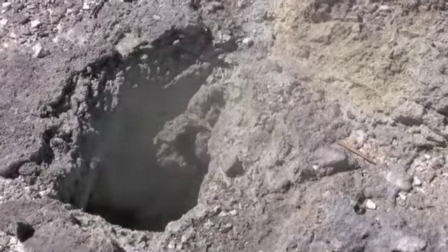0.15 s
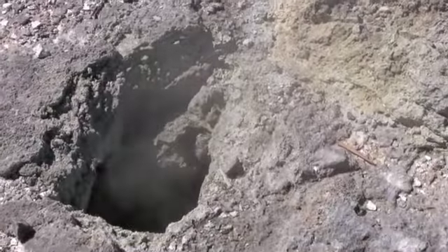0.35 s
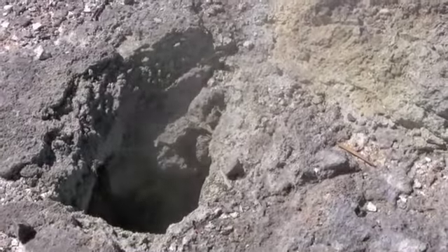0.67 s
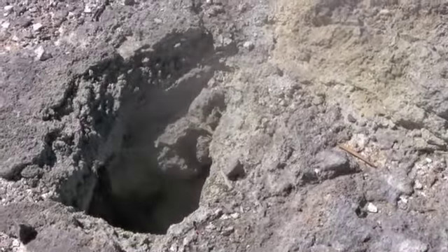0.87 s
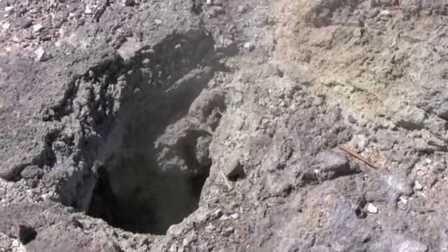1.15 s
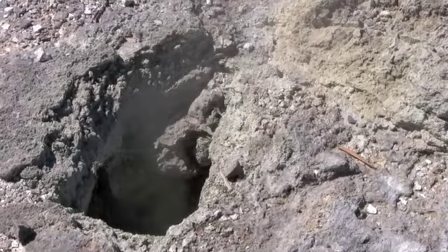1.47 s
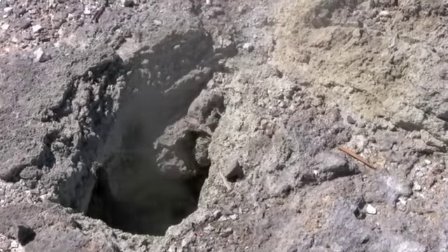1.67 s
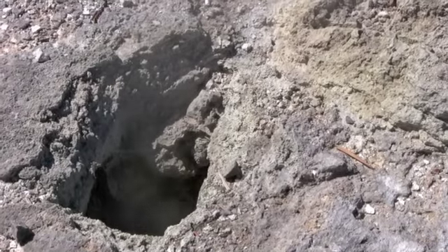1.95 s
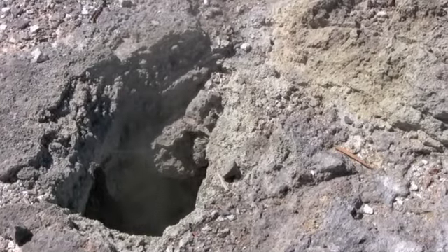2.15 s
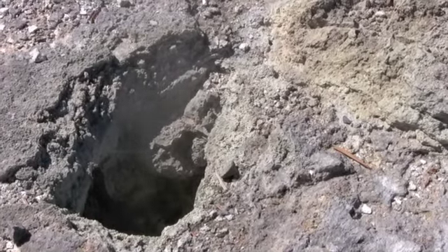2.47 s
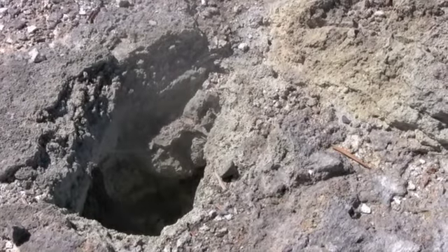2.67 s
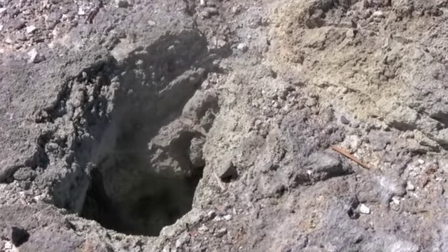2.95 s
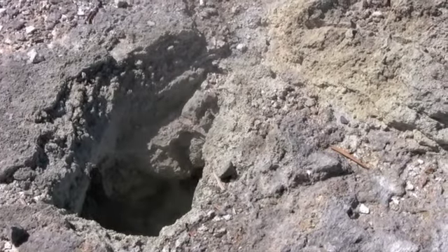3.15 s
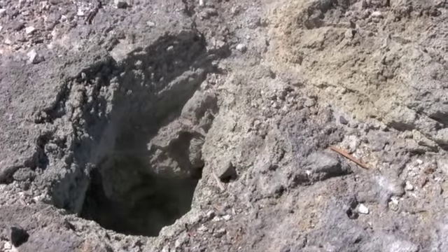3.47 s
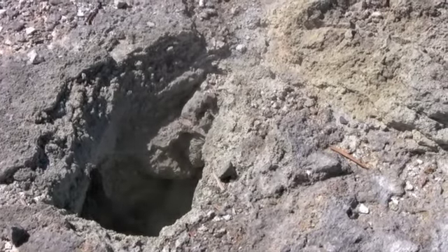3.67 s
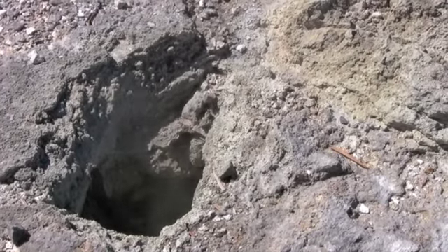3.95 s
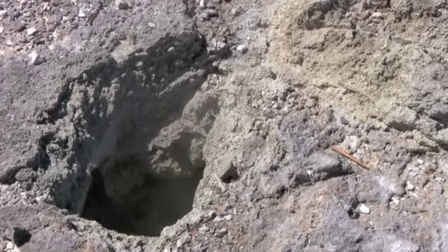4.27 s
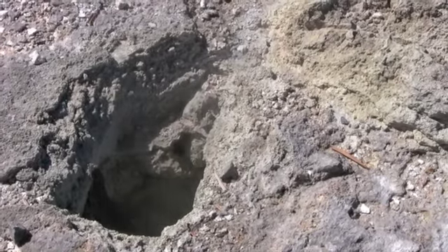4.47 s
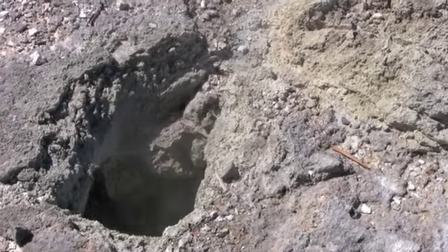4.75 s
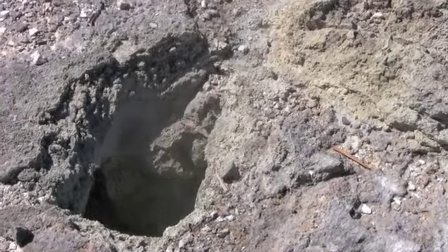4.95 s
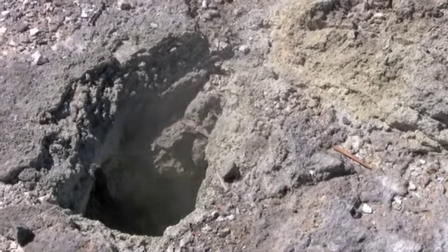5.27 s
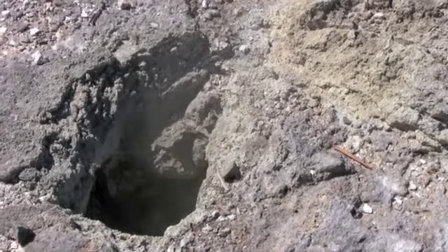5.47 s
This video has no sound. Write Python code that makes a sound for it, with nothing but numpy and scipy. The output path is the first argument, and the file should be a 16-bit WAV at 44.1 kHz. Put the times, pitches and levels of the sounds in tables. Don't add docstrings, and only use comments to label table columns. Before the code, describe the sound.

Hot mud bubbles in a stony hole, irregular low plops and wet ticks bursting in clusters over a quiet steady simmer and faint camera hiss.

```python
import sys
import numpy as np
from scipy import signal
from scipy.io import wavfile
from scipy.ndimage import uniform_filter1d

SR = 44100
rng = np.random.default_rng(int(sys.argv[2]) if len(sys.argv) > 2 else 0)


def dump(signal):
    limited = np.clip(np.atleast_2d(signal).T, -1, 1)
    pcm = np.round(limited * 32767).astype(np.int16)
    wavfile.write(sys.argv[1], SR, pcm)


def level_to_linear(level):
    exponent = np.asarray(level, float) / 20
    return 10 ** exponent


N = 247401


def evened(x):
    return x / np.sqrt(np.mean(x ** 2) + 1e-20)


def read(points, hz):
    f, value = np.transpose(points)
    return np.interp(np.log(hz + 1), np.log(f + 1), value)


def add(mix, s, sound):
    part = mix[..., round(s * SR):][..., :sound.shape[-1]]
    part += sound[..., :part.shape[-1]]


# (pitch [Hz], likeness [0-1])
LIKENESS = [(60, 0.74), (150, 0.62), (380, 0.9), (950, 0.68), (2380, 0.53), (5980, 0.07), (15000, 0.00039)]


def noise(spectrum, patchy_db, flicker_db):
    frames, hz = N // 128 + 9, np.fft.rfftfreq(1024, 1 / SR)
    a, b, c, d, patches = rng.standard_normal((frames, 513, 5)).T
    patches = uniform_filter1d(patches, size=9, axis=0)
    patches = evened(uniform_filter1d(patches, size=12, axis=1))
    flicker = evened(uniform_filter1d(rng.standard_normal(frames), size=5))
    same = np.clip(read(LIKENESS, hz), -.99, .99)[:, None]
    mid = np.sqrt(1 + same) * (a + 1j * b)
    side = np.sqrt(1 - same) * (c + 1j * d)
    level_db = read(spectrum, hz)[:, None] + patchy_db * patches + flicker_db * flicker
    z = np.array([mid + side, mid - side]) * level_to_linear(level_db)
    return evened(signal.istft(z, nperseg=1024, noverlap=896)[1][:, :N])


def bubble(hz, cycles, phase, glide, swell=.4):
    t = np.arange(round(3 * cycles / hz * SR)) / SR
    u = t * 3 * hz / max(cycles, .5)
    turns = np.cumsum(hz * (1 + glide * (u - 2))) / SR
    choke = 0.099 * np.maximum(u - 1, 0) ** 2
    shape = np.tanh(u / swell) * u * np.exp(1 - u - choke)
    return shape * np.sin(2 * np.pi * (turns + phase))


def bursts(bubbles, glide, spread_db, swell=1.1):
    out = np.zeros((2, N))
    for (s, db, hz, cycles), (chance, spot) in zip(bubbles, rng.random((len(bubbles), 2))):
        pan = level_to_linear(spread_db * (spot - .5) * np.array([[1], [-1]]))
        phase = 0.4 + 0.33 * chance
        add(out, s, level_to_linear(db) * pan * bubble(hz, cycles, phase, glide, swell))
    return out


def singles(table, cycles):
    return [(s, db, hz, max(cycles - 0.13 * (db + 25.0), .6)) for s, db, hz in table]


def chains(table, cycles, scatter, count):
    rows = []
    for (s, length, db, *hz), luck in zip(table, rng.random((len(table), count, 3)) - .5):
        for u, (late, off, loud) in zip(np.linspace(0, 1, count), luck):
            pitch = hz[0] * (hz[-1] / hz[0]) ** u * (1 + scatter * off)
            start = s + length * abs(u + late / count)
            rows.append((start, db - 3.5 * loud, pitch, cycles * (1 + off)))
    return rows


# (pitch [Hz], level [dB per Hz])
SIMMER_COLOUR = [(15, -46), (25, -15.5), (197, -1), (397, -5), (456, -4.5), (709, -12.5), (832, -10.5),
                 (939, -15), (1040, -11.5), (1250, -20), (1480, -24), (1750, -25), (3000, -36.5),
                 (3900, -37), (6600, -120)]
# (time [s], level [dB])
HEAT = [
    (0.0, -43),
    (0.97, -41),
    (3.09, -42),
    (3.51, -39.5),
    (3.86, -42.5),
    (4.97, -40.5),
    (5.61, -43),
]


def simmer():
    grains = np.zeros((2, N))
    for hz in np.geomspace(130, 2600, num=24):
        hit, size, spot = rng.random((N, 3)).T
        starts = hit < .05 * hz / SR
        train = starts * level_to_linear(-3.5 * np.log(size + .04))
        pan = np.array([0.78 + 0.96 * spot, 1.6 - 1.24 * spot])
        grain = level_to_linear(read(SIMMER_COLOUR, hz)) * np.sqrt(hz) * bubble(hz, 3.37, rng.random(), 0.033)
        grains += signal.oaconvolve(train * pan, grain[None], axes=1)[:, :N]
    rumble = noise(SIMMER_COLOUR, patchy_db=3.0, flicker_db=0.0)
    s, db = np.transpose(HEAT)
    heat = level_to_linear(np.interp(np.arange(N) / SR, s, db))
    return heat * (level_to_linear(-5) * evened(grains) + level_to_linear(-2) * rumble)


# (pitch [Hz], level [dB per Hz])
HISS_COLOUR = [(880, -45), (1500, -10), (3030, -10), (3590, -9), (5660, -10), (6180, -7), (8830, -11.5),
               (9560, -8), (10000, -12.5), (12200, -11), (16000, -29.5)]


def hiss():
    return level_to_linear(-61.5) * noise(HISS_COLOUR, patchy_db=2.0, flicker_db=1.5)


# (pitch [Hz], level [dB rms])
WHINE = [(3510, -80), (3588, -79), (4036, -83), (4465, -83), (4484, -81), (4681, -80), (5243, -83),
         (5381, -80), (6153, -83), (6347, -83), (7186, -84), (8425, -85), (9262, -82), (9321, -83),
         (9359, -73), (9458, -78), (9475, -81), (9515, -79), (9563, -81), (9615, -81), (10530, -82),
         (10667, -84), (11071, -85), (11655, -83), (11784, -82), (11946, -86)]


def motor_whine():
    t, out = np.arange(N) / SR, np.zeros((2, N))
    faint = [(3800 + 8500 * place, -89 + 4 * chance) for place, chance in rng.random((40, 2))]
    for hz, db in WHINE + faint:
        waver = level_to_linear(4.4 * evened(uniform_filter1d(rng.standard_normal(N // 500 + 2), size=6)))
        waver = np.interp(np.arange(N) / 500, np.arange(len(waver)), waver)
        lead = np.pi * np.clip((hz - 3000) / 7800, 0, 1) * np.array([[-.5], [.5]])
        tone = np.sin(2 * np.pi * (hz * t + rng.random()) + lead)
        out += np.array([[1.1], [1.6]]) * level_to_linear(db - 1.5) * waver * tone
    return out


# (pitch [Hz], level [dB])
BODY_COLOUR = [(3900, -20), (4200, -5), (4700, 0.5), (5200, -12), (6000, 3.5), (6600, -16), (8000, -5),
               (11000, -32)]
# (start [s], end [s], level [dB])
LENS_MOVES = [
    (0, 0.105, -70.5),
    (.86, 0.943, -72),
    (2.002, 2.194, -68),
    (2.45, 2.55, -87),
    (3.15, 3.247, -68.5),
    (4.106, 4.243, -66.5),
    (5.238, 5.386, -68.5),
]


def lens_drive():
    t, step_hz = np.arange(N) / SR, 300.05
    buzz = np.zeros(N)
    for k in range(13, 40):
        hz = k * step_hz
        buzz += level_to_linear(read(BODY_COLOUR, hz)) * np.sin(2 * np.pi * (hz * t + rng.random()))
    gate = level_to_linear(-77.0) + sum(level_to_linear(db) * (t > a) * (t < b) for a, b, db in LENS_MOVES)
    return evened(buzz) * uniform_filter1d(gate, size=600) * np.array([[1.15], [.85]])


# (time [s], peak level [dB], pitch [Hz])
BLIPS = [(.004, -31.5, 159), (1.686, -31, 110), (.43, -27, 93), (.51, -35, 274), (1.251, -40, 121),
         (4.96, -21.5, 402), (0.108, -30, 238), (0.125, -30.5, 347), (0.258, -42, 207), (0.386, -31, 196),
         (.709, -31.5, 800), (0.088, -26.5, 400), (0.52, -30, 152), (0.648, -26.5, 527),
         (1.708, -28.5, 229), (.834, -30, 620), (0.846, -28, 247), (1.723, -29.5, 564), (2.144, -32, 620),
         (2.676, -38, 197), (2.949, -29, 307), (2.956, -33.5, 193), (3.161, -33, 200), (2.5, -28.5, 142),
         (3.579, -33, 647), (3.597, -35, 1100), (3.602, -32.5, 610), (3.803, -28.5, 443),
         (3.913, -33.5, 477), (4.087, -32, 1100), (4.733, -31, 624), (4.744, -30, 600), (4.823, -40, 1120),
         (4.851, -31.5, 197), (5.15, -26.5, 425)]


def blips():
    rows = [(s, db, hz, 2.6 + hz / 900) for s, db, hz in BLIPS]
    return bursts(rows, glide=0.031, spread_db=1.2, swell=0.96)


# (time [s], peak level [dB], pitch [Hz])
THUMPS = [(.397, -22, 197), (.423, -19, 201), (.438, -45, 159), (.455, -10.5, 215), (.462, -15, 198),
          (1.048, -25.5, 165), (1.097, -24, 210), (1.323, -21.5, 185), (1.9, -18, 215), (1.9445, -10, 162),
          (1.96, -18, 145), (1.988, -16, 210), (2.519, -29, 174), (2.534, -28, 205), (3.2735, -20, 202),
          (2.271, -29, 230), (2.528, -21.5, 207), (2.743, -23.5, 183), (2.829, -28, 300),
          (3.206, -27.5, 222), (3.268, -16, 207), (3.296, -29, 180), (3.473, -22, 205), (3.543, -22.5, 191),
          (4.105, -17, 196), (4.255, -23, 180), (4.553, -30.5, 178), (4.639, -24, 230), (4.874, -22.5, 175),
          (4.9005, -4, 223), (4.907, -12, 257), (4.915, -6.5, 250), (4.957, -20, 162), (5.022, -28.5, 217),
          (5.59, -21.5, 197)]


def thumps():
    rows = [(s - 0.0023, *rest) for s, *rest in singles(THUMPS, cycles=2.4)]
    return bursts(rows, glide=0.026, spread_db=1.2, swell=1.12)


# (time [s], peak level [dB], centre pitch [Hz], length [s])
SPRAY = [(0.42, -43.5, 7460, 0.0036), (0.468, -52, 1890, 0.039), (0.481, -52, 3280, 0.025),
         (0.706, -58, 6700, 0.0073), (0.988, -59.5, 8000, 0.006), (1.748, -55.5, 2010, 0.044),
         (1.762, -55.5, 6100, 0.014), (1.937, -58, 6500, 0.0074), (1.951, -58, 1800, .02),
         (1.986, -54.5, 2720, 0.017), (2.014, -55, 2980, 0.022), (2.32, -61, 4040, 0.0095),
         (3.27, -60, 3430, 0.0091), (3.288, -52, 2880, 0.021), (3.348, -58, 9000, 0.0063),
         (3.482, -52.5, 5000, 0.014), (3.518, -54, 6140, 0.018), (3.498, -59, 1800, .03),
         (3.537, -53, 1470, 0.029), (3.706, -50.5, 5940, 0.019), (4.383, -45, 5070, 0.0066),
         (4.884, -59, 3470, 0.051), (4.929, -47.5, 2720, 0.045), (4.932, -52, 6260, 0.049),
         (4.967, -48, 10200, 0.0047), (4.89, -61, 1510, 0.021), (4.927, -48.5, 1280, 0.047),
         (4.944, -48, 2200, 0.021), (0.412, -47, 1700, 0.027), (0.482, -43.5, 1280, 0.028),
         (1.954, -51, 1220, 0.028), (1.982, -53, 1260, 0.035), (2.554, -50.5, 1320, 0.015),
         (3.264, -49, 1310, 0.025), (3.286, -50, 1350, 0.025), (3.472, -51, 1300, 0.02),
         (1.106, -46, 1380, 0.016), (5.218, -49, 7740, 0.004)]


def spray():
    out = np.zeros((2, N))
    for (s, db, hz, length), air in zip(SPRAY, rng.standard_normal((len(SPRAY), 3, 4000))):
        u = np.arange(4000) / SR / max(length / 2.5, .0003)
        swell = (u * np.exp(1 - u)) ** 2
        edges = [.7 * hz, min(1.4 * hz, SR / 2.8)]
        band = signal.butter(3, edges, "band", fs=SR, output="sos")
        grains = level_to_linear(4.5 * evened(uniform_filter1d(air[2], size=60)))
        both = air[0] + 0.08 * air[:2][::-1]
        add(out, s, level_to_linear(db) * swell * evened(signal.sosfilt(band, grains * both)))
    return out


# (time [s], peak level [dB], pitch [Hz])
POPS = [(.414, -20, 452), (.421, -13, 1160), (.438, -19.5, 607), (.4708, -8, 570), (.479, -25, 856),
        (.878, -28.5, 633), (1.749, -11.5, 577), (1.765, -17.5, 526), (1.918, -27, 510), (1.9605, -18, 567),
        (1.968, -15, 408), (1.996, -12.5, 550), (2.0145, -11, 562), (2.0065, -22, 555), (2.0095, -20, 620),
        (1.7605, -32, 534), (2.5475, -21.5, 710), (2.565, -34, 496), (.4745, -8.5, 615), (1.36, -37, 650),
        (5.166, -34, 510), (2.039, -31, 590), (2.307, -29, 518), (2.557, -18.5, 556), (3.277, -17, 418),
        (3.299, -23.5, 484), (3.332, -26, 500), (3.473, -19, 394), (3.501, -15.5, 570), (3.519, -27, 634),
        (3.544, -31, 890), (4.281, -18, 451), (4.797, -23.5, 643), (4.899, -12, 570), (4.905, -7.5, 434),
        (4.9145, -6, 570), (4.924, -16, 513), (5.052, -31, 500)]


def pops():
    return bursts(singles(POPS, cycles=4.26), glide=0.031, spread_db=1.2, swell=0.96)


# (time [s], length [s], peak level [dB], pitch [Hz])
TICKS = [(.4205, 0.00067, -40, 4370), (.471, .016, -40, 1720), (.484, .012, -44, 2100),
         (.491, .006, -39, 1700), (.495, 0.0068, -38, 2500), (.488, .014, -47, 3900),
         (3.284, 0.013, -44, 2300), (3.284, 0.004, -44, 3300), (3.293, 0.013, -46, 3850),
         (3.475, .011, -35, 1890), (3.51, 0.022, -44, 1690), (4.939, 0.014, -34.5, 2200),
         (4.938, 0.018, -40, 3600), (4.944, 0.024, -40, 6950)]


def ticks():
    return bursts(chains(TICKS, cycles=9.1, scatter=0.096, count=3), glide=.02, spread_db=3)


# (time [s], length [s], peak level [dB], centre pitch [Hz])
CRACKLES = [(.4205, 0.0011, -26.5, 2540), (.476, 0.034, -45, 1900), (1.752, 0.021, -41.5, 1840),
            (1.955, 0.015, -50, 1480), (1.964, 0.0086, -42, 2500), (1.99, 0.017, -48, 2800),
            (3.39, 0.0075, -35, 1750), (3.475, 0.013, -39, 2600), (3.519, 0.0099, -34.5, 3000),
            (3.544, 0.0089, -42, 1600), (4.898, 0.0084, -37, 1900), (4.93, 0.055, -37, 1500)]


def crackles():
    return bursts(chains(CRACKLES, cycles=1.77, scatter=0.84, count=5), glide=.02, spread_db=3)


def knock():
    t, out = np.arange(4000) / SR, np.zeros((2, N))
    ring = level_to_linear(-30.5 - 60 * t / 0.074) * np.sin(2 * np.pi * 2400 * t)
    body = level_to_linear(-19.0 - 60 * t / 0.015) * np.sin(2 * np.pi * 1170 * t)
    rough = np.diff(uniform_filter1d(rng.standard_normal(4001), size=7))
    crack = level_to_linear(-31 - 60 * t / 0.008) * evened(rough)
    tap = ring * np.array([[.4], [1.5]]) + body * np.array([[1.2], [-.9]])
    add(out, .4215, tap + crack * np.array([[1], [-1]]))
    return out


# (time [s], length [s], peak level [dB], first pitch [Hz], last pitch [Hz])
GURGLES = [(.423, 0.036, -31, 840, 440), (.478, 0.01, -21.5, 607, 545), (1.084, 0.006, -29.5, 520, 570),
           (1.096, 0.0023, -33, 790, 1176), (1.337, 0.027, -31.5, 275, 590), (1.751, 0.015, -26, 442, 834),
           (1.966, 0.016, -22, 570, 433), (1.963, 0.011, -32, 1060, 1130), (1.984, 0.0088, -21, 428, 490),
           (2.002, 0.0045, -20, 396, 493), (2.534, 0.0089, -24, 327, 465), (2.554, 0.0027, -20.5, 626, 620),
           (3.285, 0.019, -23, 500, 740), (3.476, 0.014, -26.5, 640, 450), (4.1, 0.027, -26.5, 296, 380),
           (4.8715, .012, -21, 600, 577), (4.899, 0.01, -22, 388, 820), (4.931, .022, -23.5, 840, 770),
           (4.955, 0.012, -37, 790, 990), (4.941, 0.023, -25.5, 406, 630), (4.933, 0.017, -26, 1100, 1260),
           (4.985, 0.0027, -38, 424, 416), (5.025, 0.0098, -27, 448, 644), (5.6, 0.0054, -26, 300, 345)]


def gurgles():
    rows = chains(GURGLES, cycles=2.95, scatter=0.17, count=4)
    return bursts(rows, glide=0.031, spread_db=1.2, swell=0.96)


# (time [s], peak level [dB], pitch [Hz], ring length [cycles])
PINGS = [(.429, -50, 3220, 30), (.625, -42, 2210, 2.5), (.7103, -31.5, 2090, 4.8), (.7726, -42, 2250, 5),
         (.8774, -44, 2100, 6), (1.0974, -25, 2090, 7), (1.0985, -36, 1230, 6), (1.099, -50, 3100, 10),
         (1.1015, -34.5, 2180, 6.5), (1.118, -55, 2120, 6.4), (1.201, -42.5, 2320, 5),
         (1.344, -41, 2070, 22), (1.357, -48, 3620, 10), (1.4745, -37, 2290, 5.4), (1.506, -44, 2200, 5),
         (1.5464, -35.5, 2460, 3.2), (1.7235, -50, 1960, 5.3), (1.7374, -40, 1720, 5),
         (1.7609, -44, 1840, 4.4), (1.8692, -47, 2400, 5.4), (1.9185, -53, 2280, 5), (1.933, -44, 2300, 6),
         (1.933, -47, 3500, 10), (1.9405, -39, 2300, 5.5), (1.9415, -41, 3420, 13), (2.015, -52, 3260, 12),
         (2.2603, -48, 2200, 5), (2.3161, -34, 2190, 4.2), (2.317, -45, 3200, 10), (2.3165, -48, 5760, 10),
         (2.5575, -33.5, 2990, 16), (2.56, -36.5, 3390, 13), (2.564, -40, 2930, 6), (2.581, -42, 1800, 3.3),
         (2.7043, -45, 2220, 11), (2.7043, -44, 2740, 6.5), (3.268, -31.5, 2260, 25),
         (3.2805, -27.5, 2120, 9.3), (3.27, -41.5, 4000, 32), (3.2995, -34, 2070, 9.4),
         (3.305, -45, 1980, 8.2), (3.486, -44, 3950, 21), (3.524, -44, 3720, 13), (3.711, -41, 4040, 7.7),
         (4.9565, -43, 10400, 30), (5.05, -35, 1680, 11), (5.048, -37.5, 2410, 8.2),
         (5.1118, -36.5, 2730, 3.5), (5.1995, -40, 2800, 5.5), (5.2145, -42.5, 2740, 7.6)]


def pings():
    return bursts(PINGS, glide=.002, spread_db=3, swell=0.3)


# (time [s], peak level [dB], pitch [Hz],
# ring length [cycles])
FURTHER_BUBBLES = [(.4722, -15.5, 840, 7), (.4705, -24, 194, 3.2), (.4905, -21, 330, 2.3), (0.48, -21, 400, 1.3),
                   (.4375, -24, 200, 3), (1.943, -27, 600, 1.6), (1.963, -30.5, 203, 3.8), (1.971, -22, 302, 3),
                   (1.979, -22.5, 221, 4.1), (1.997, -28.5, 210, 3.5), (2.018, -38, 250, 2.5),
                   (2.0395, -17.5, 330, 0.72), (3.2985, -29, 380, 1.1), (3.4775, -18, 323, 1.6),
                   (3.51, -28, 507, 3.6), (3.529, -25, 504, 1.9), (3.535, -29, 720, 2), (3.5465, -31, 1150, 3),
                   (3.594, -34, 895, 3.5), (4.924, -20, 190, 2.6), (4.938, -26, 196, 2.5), (4.9595, -27, 510, 1.4),
                   (5.9, -29, 460, 2.5), (5.05, -22.5, 343, 1.7), (5.264, -32, 420, 4.8), (1.788, -35, 300, 2.3),
                   (1.182, -36.5, 178, 5.2), (4.905, -17.5, 280, 3), (4.928, -21, 280, 2.8), (5.37, -35, 287, 2.4),
                   (1.941, -20, 138.9, 1.2), (1.98, -35, 1180, 2.8), (.483, -20.5, 857, 3.2), (3.484, -21, 516, 2.5),
                   (.464, -24, 630, 2), (1.041, -31, 189, 2), (1.33, -22, 195, 3), (1.885, -30, 191, 3),
                   (1.068, -25, 380, 2), (1.108, -31, 750, 3), (1.23, -32.5, 330, 2), (2.456, -30, 403, 2),
                   (2.481, -29, 400, 1.4), (2.555, -30, 198, 2.5), (4.79, -29, 450, 2.2)]


def further_bubbles():
    return bursts(FURTHER_BUBBLES, glide=.02, spread_db=1.2)


# (time [s], length [s], peak level [dB], centre pitch [Hz])
SPLATTER = [(.488, 0.012, -40, 2300), (1.1, .006, -54, 2700), (1.6, .014, -44, 1500),
            (1.8, 0.023, -46, 2400), (2.2, .012, -49, 2900), (2.7, 0.0074, -45.5, 2800),
            (3.6, 0.012, -45, 2900), (3.288, .018, -46, 2600), (2.7, .022, -52, 1700),
            (2.7, 0.026, -50, 1800), (4.1, 0.025, -46, 2200), (4.9, 0.017, -51, 1800),
            (4.932, 0.021, -38, 1800), (4.936, 0.037, -46, 3400), (4.975, 0.022, -51, 2300),
            (4.3, .008, -44, 1940), (5.11, 0.0055, -47, 3800), (0.52, .018, -43, 1700),
            (1.6, .03, -41, 1600), (1.092, .02, -42, 1430), (4.99, .05, -47, 1600), (3.27, .035, -45, 1400),
            (2.03, .025, -41, 1200), (.505, .025, -46, 1100)]


def splatter():
    return bursts(chains(SPLATTER, cycles=2.4, scatter=0.79, count=8), glide=.02, spread_db=3)


# (pitch [Hz], width [Hz], level [dB])
AIR_COLUMN = [
    (192.6, 35.5, 3.5),
    (602, 82, -3),
    (847, 30, 5),
    (1126, 80, 0),
    (2070, 43, -35),
]


def hole(x):
    out = x.copy()
    for hz, width, db in AIR_COLUMN:
        out += level_to_linear(db) * signal.lfilter(*signal.iirpeak(hz, hz / width, SR), x)
    return level_to_linear(-2.0) * signal.lfilter(*signal.butter(3, 105, "high", fs=SR), out)


def scene():
    pool = blips() + thumps() + pops() + ticks() + crackles()
    pool += gurgles() + pings() + further_bubbles() + splatter()
    camera = hiss() + motor_whine() + lens_drive() + knock()
    return hole(pool) + simmer() + spray() + camera


def low_pass(x):
    return signal.sosfilt(signal.butter(12, 15700, fs=SR, output="sos"), x)


def record(dry):
    mix = signal.lfilter(*signal.butter(3, 40, "high", fs=SR), dry)
    return low_pass(mix)


dry = scene()
out = record(dry)
dump(out)
```